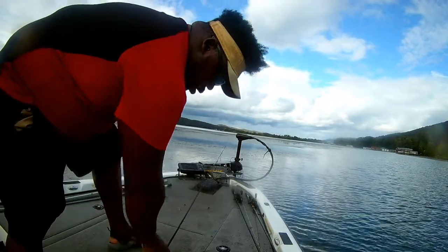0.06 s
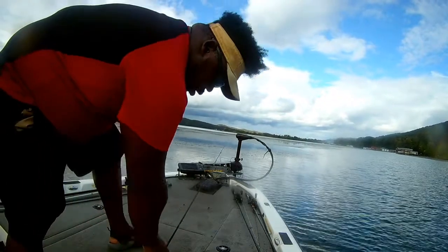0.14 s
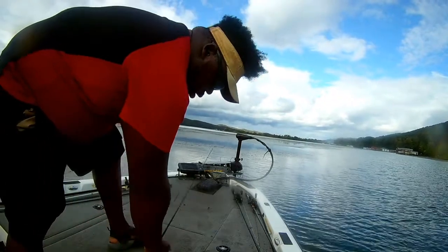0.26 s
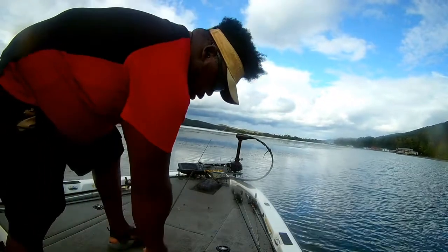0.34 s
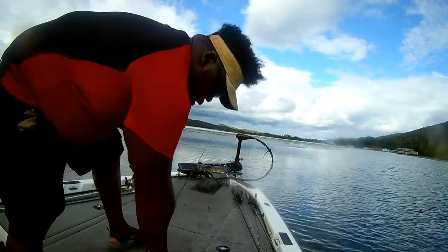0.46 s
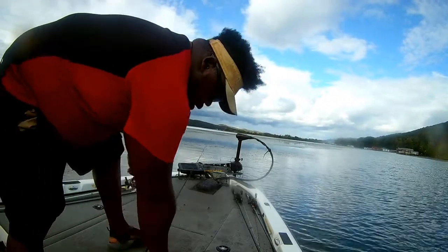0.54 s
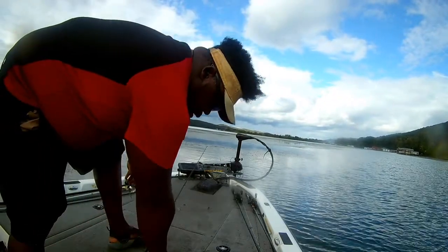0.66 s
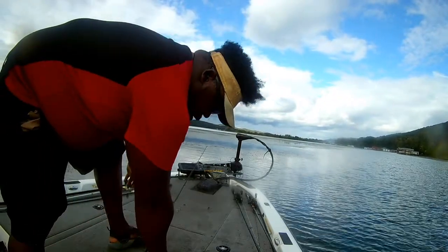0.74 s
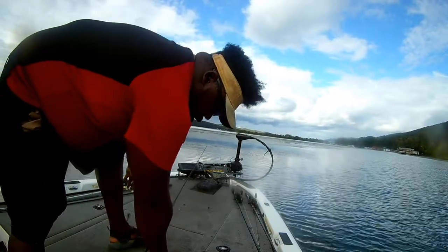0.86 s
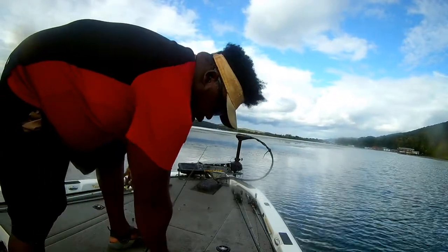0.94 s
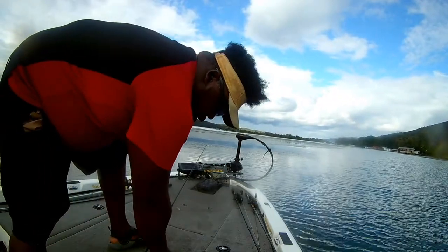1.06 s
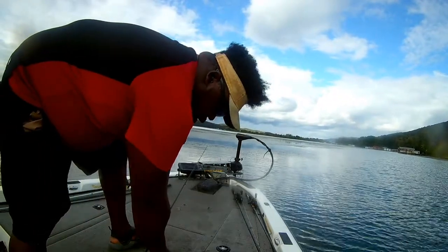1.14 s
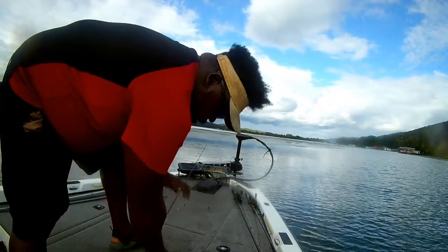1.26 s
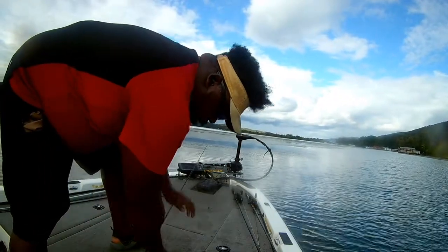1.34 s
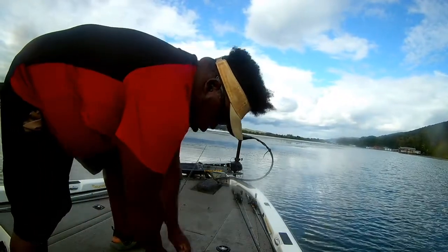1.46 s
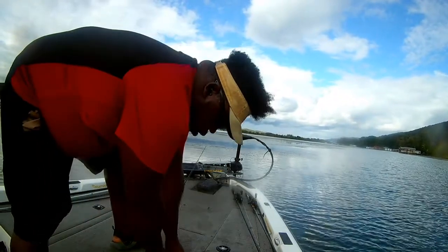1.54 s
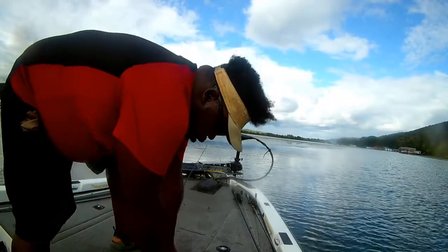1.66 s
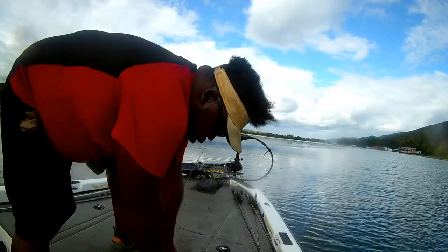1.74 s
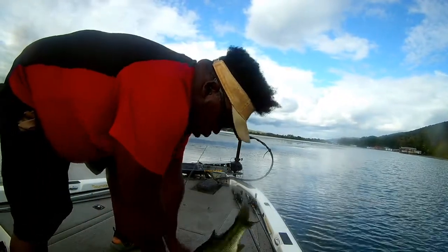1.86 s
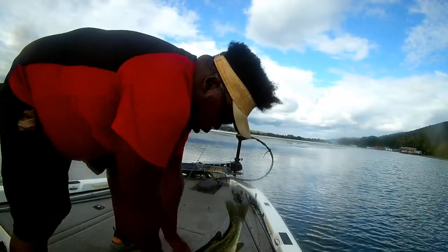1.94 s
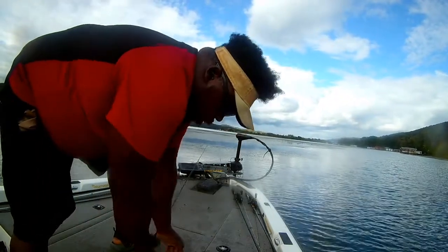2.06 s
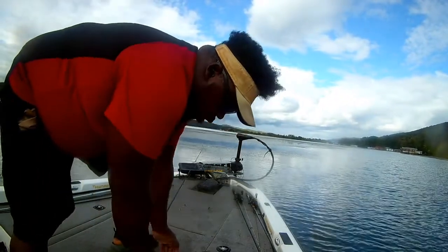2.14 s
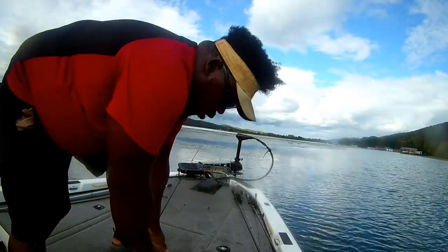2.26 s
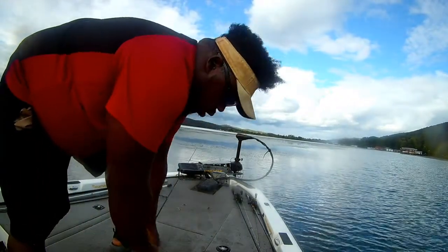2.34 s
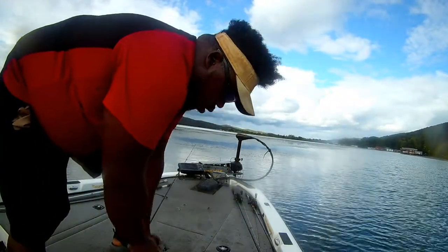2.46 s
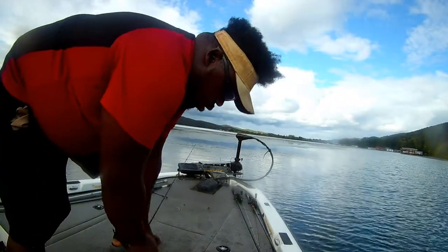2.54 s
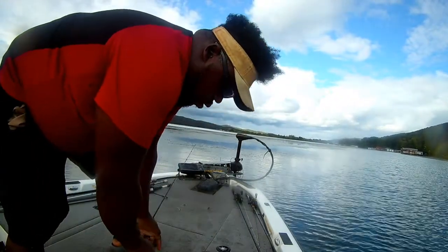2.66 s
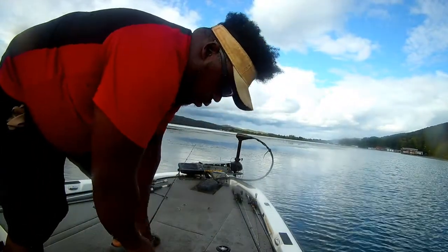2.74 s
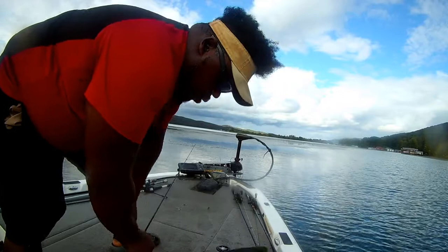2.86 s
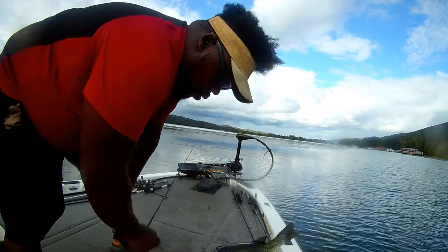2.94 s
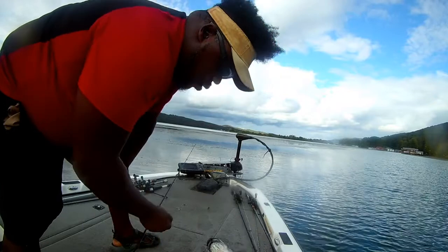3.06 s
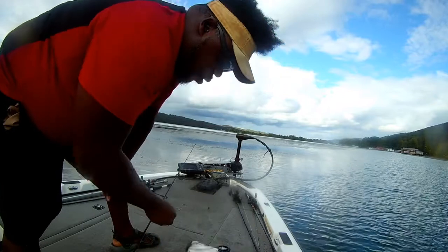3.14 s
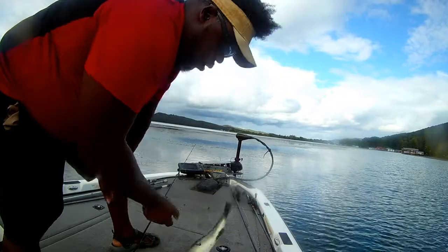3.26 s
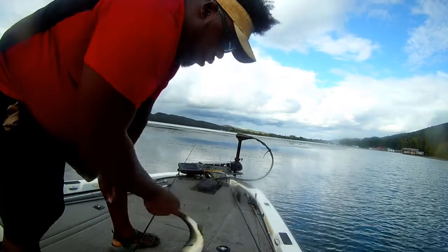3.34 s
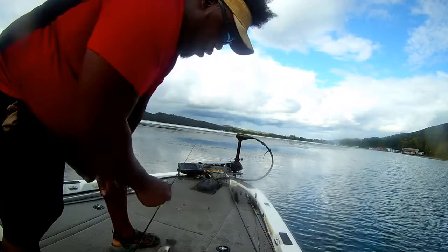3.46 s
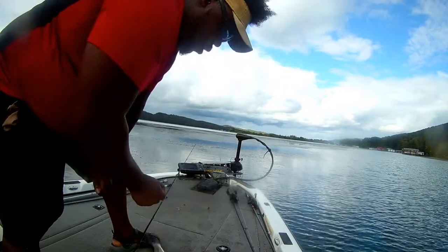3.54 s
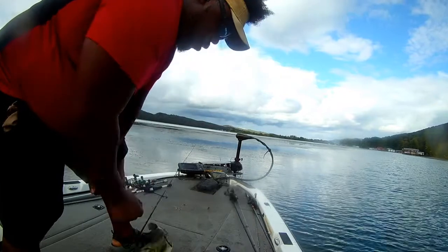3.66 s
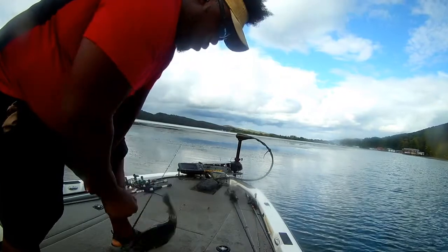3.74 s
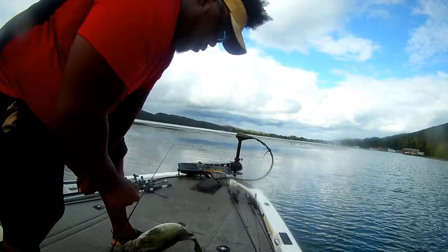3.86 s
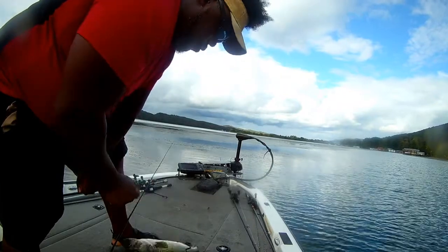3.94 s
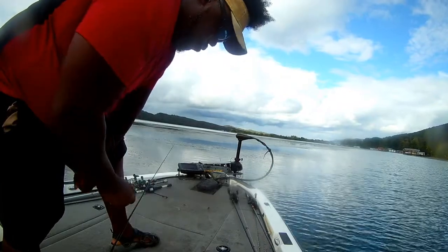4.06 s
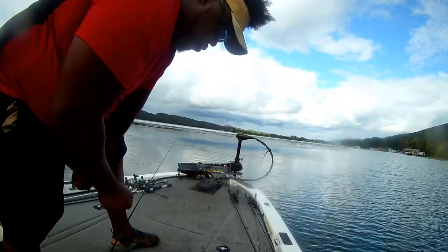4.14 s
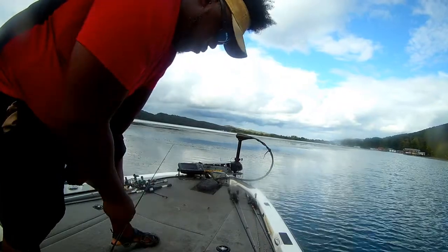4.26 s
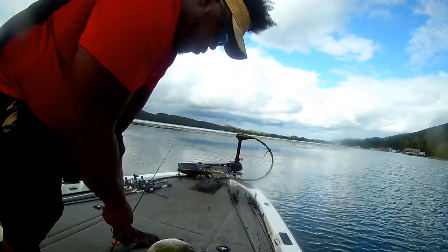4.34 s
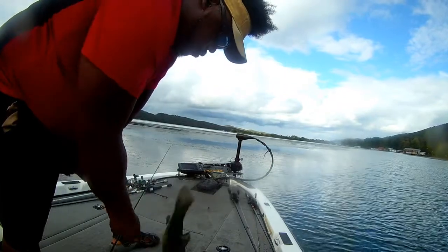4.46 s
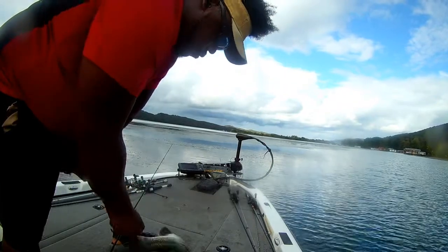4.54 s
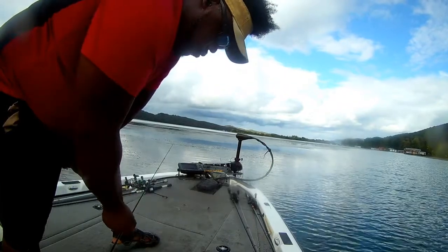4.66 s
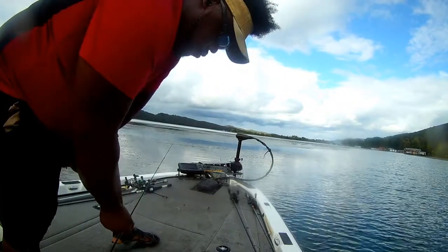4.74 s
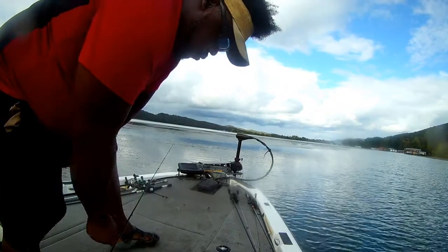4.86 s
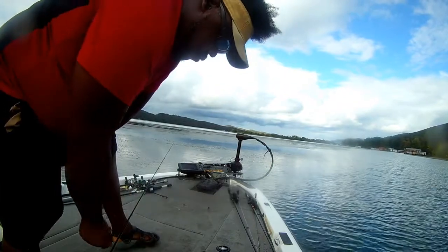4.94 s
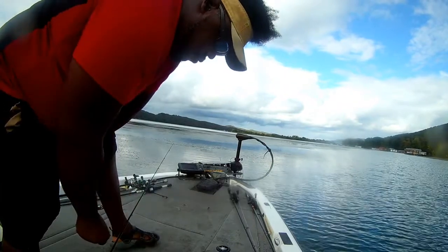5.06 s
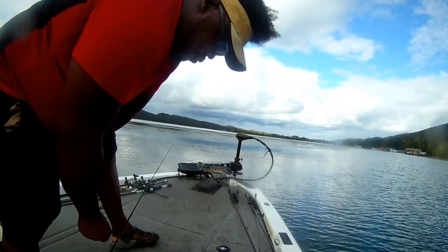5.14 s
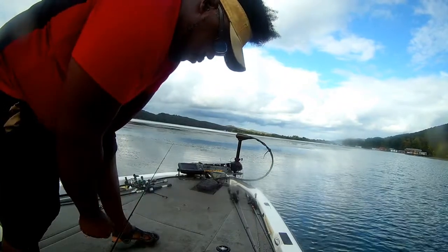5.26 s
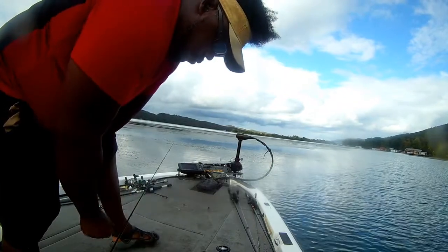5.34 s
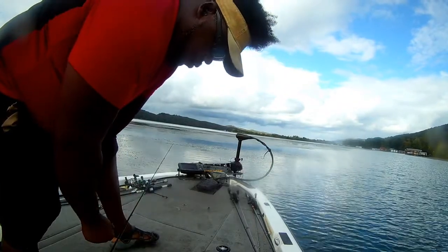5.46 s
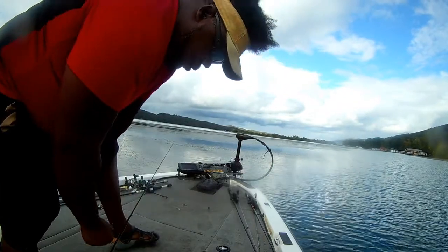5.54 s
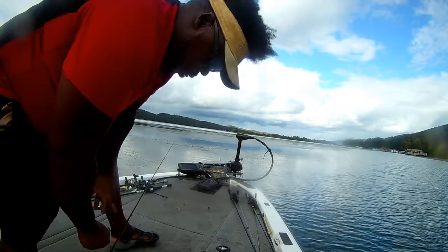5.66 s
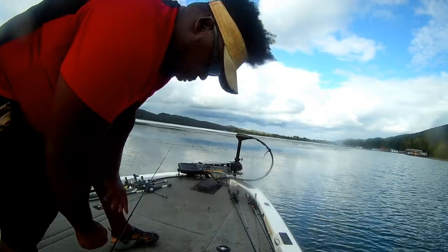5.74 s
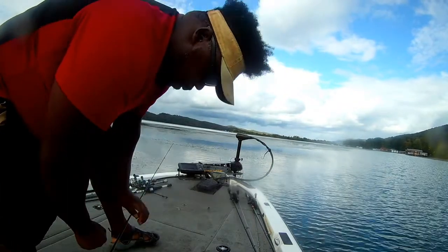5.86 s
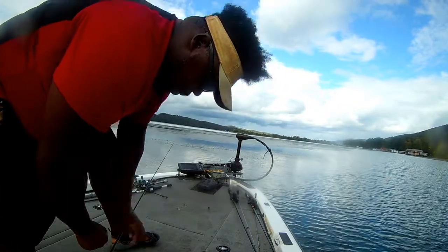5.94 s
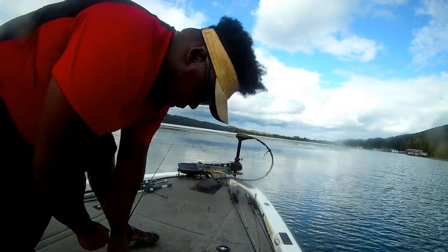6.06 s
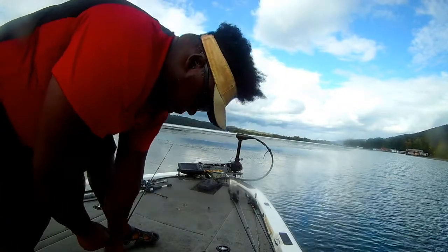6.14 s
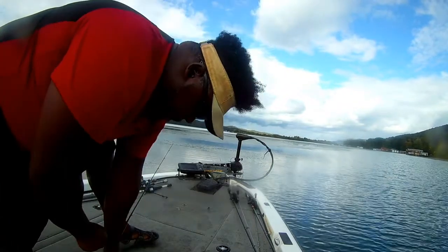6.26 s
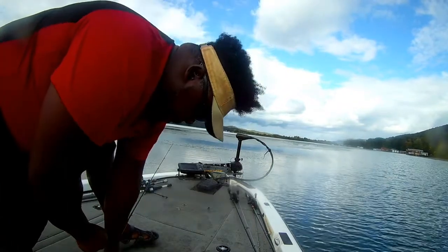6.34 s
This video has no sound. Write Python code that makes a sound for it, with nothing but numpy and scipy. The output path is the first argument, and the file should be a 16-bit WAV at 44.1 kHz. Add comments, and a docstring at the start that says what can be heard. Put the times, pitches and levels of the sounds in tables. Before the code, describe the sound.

Wind and water rumble low against the hull of a small boat, with a few soft bumps. Then a freshly caught fish thrashes on the carpeted deck close by: its body thuds on the hollow boards, its wet tail slaps and hatch lids knock, the hardest blows distorting. It skids briefly over the carpet, flops a few more times and lies still. Two dull bumps follow.

```python
"""Wind and water rumble on the hull of a small boat throughout, and a few soft bumps come first.
From about 2 s a freshly caught fish thrashes on the carpeted deck: its body thuds on the hollow boards,
its wet tail and fins slap, hatch lids knock, and the hardest blows distort. A faint whistle passes at
2.5 s, and just after 3 s the fish skids over the carpet. By 5 s it lies still; two more bumps follow."""
import sys
import numpy as np
from scipy import signal
from scipy.io import wavfile
from scipy.ndimage import uniform_filter1d

SR = 44100
rng = np.random.default_rng(int(sys.argv[2]) if len(sys.argv) > 2 else 0)


def materialize(psi):
    """Save the field psi as 16-bit PCM at rate SR to the path in sys.argv[1].

    A 1-D psi becomes a single channel; in a 2-D psi each row is a channel.
    """
    bounded = np.clip(np.atleast_2d(psi).T, -1, 1)
    quanta = np.round(bounded * 32767).astype(np.int16)
    wavfile.write(sys.argv[1], SR, quanta)


N = 282681


def gain_of(db):
    """Turns decibels into a factor to multiply by."""
    return 10 ** (np.asarray(db) / 20)


def unit_rms(x):
    """Scales a sound to an average (rms) level of one."""
    return x / np.sqrt(np.mean(x ** 2) + 1e-20)


def value_at(points, hz):
    """Looks up a frequency in a table, with every octave equally wide."""
    table_hz, value = np.transpose(points)
    return np.interp(np.log(hz + 1), np.log(table_hz + 1), value)


def add(mix, start, sound):
    """Lays a sound into the mix at a start in seconds."""
    part = mix[round(start * SR):][:len(sound)]
    part += sound[:len(part)]


def crest(x, size=128):
    """Height of the strongest few milliseconds of a sound."""
    return np.sqrt(2 * uniform_filter1d(x ** 2, size).max())


def coloured(x, db_at, size=4096):
    """Shapes the tone by the curve db_at(hz), ringing only after each click, never before."""
    hz = abs(np.fft.fftfreq(size, 1 / SR))
    log_gain = np.log(gain_of(db_at(hz)))
    taps = np.fft.ifft(np.exp(np.conj(signal.hilbert(log_gain)))).real
    return signal.fftconvolve(x, taps[:size // 2])[:len(x)]


def filtered(x, hz, kind, order=2):
    """Keeps what lies below hz ("low") or above it ("high")."""
    return signal.sosfilt(signal.butter(order, min(hz, SR / 2 - 1), kind, fs=SR, output="sos"), x)


def patchy_noise(colour, patchy_db):
    """Noise of a given tone colour whose level drifts in patches of time and pitch."""
    hz = np.fft.rfftfreq(2048, 1 / SR)
    real, imag, patches = rng.standard_normal((3, len(hz), N // 512 + 5))
    patches = uniform_filter1d(patches, size=7, axis=0)
    patches = unit_rms(uniform_filter1d(patches, size=6, axis=1))
    spectra = (real + 1j * imag) * gain_of(value_at(colour, hz)[:, None] + patchy_db * patches)
    return unit_rms(signal.istft(spectra, nperseg=2048, noverlap=1536)[1][:N])


def wind_and_water(rumble_boost_db=3, hiss_db=-61):
    """A lumpy rumble on the hull rises and falls with the wind, under an even hiss."""
    # Tone colours of the rumble and the hiss. Each row: frequency in Hz, relative level in dB.
    rumble_colour = [(20, -11.5), (70, -3), (117, -6), (166, -10.5), (213, -8), (290, -13.5), (329, -13.5),
                     (380, -20.5), (517, -27), (826, -36), (1500, -42), (2500, -65.5)]
    hiss_colour = [(300, -2), (1000, 9.5), (1500, 8.5), (2500, 0.5), (4500, -5.5), (10500, -12),
                   (15500, -7.5)]
    # Strength of the wind. Each row: time in seconds, relative level in dB.
    wind = [(0, -39.5), (1.8, -40.5), (3.5, -36), (4.602, -39), (6.41, -38)]
    wind_db = np.interp(np.arange(N) / SR, *np.transpose(wind))
    rumble = gain_of(wind_db + rumble_boost_db) * patchy_noise(rumble_colour, patchy_db=2.0)
    return rumble + gain_of(hiss_db) * patchy_noise(hiss_colour, patchy_db=0.8)


def whistle(flutter_hz=45):
    """A faint, thin, fluttering tone; gives its start and its sound."""
    # Path of the tone. Each row: time in seconds, pitch in Hz, level in dB.
    path = [(2.40, 2380, -90), (2.435, 2290, -63.5), (2.56, 2235, -62), (2.69, 2260, -68)]
    times, hz, db = np.transpose(path)
    t = np.arange(times[0], times[-1], 1 / SR)
    flutter = filtered(rng.standard_normal(len(t)) + 1j * rng.standard_normal(len(t)), flutter_hz, "low")
    cycles = np.cumsum(np.interp(t, times, hz)) / SR
    tone = (flutter * np.exp(2j * np.pi * cycles)).real
    return times[0], gain_of(np.interp(t, times, db)) * unit_rms(tone)


def thud(db, contact_hz, ring_db, damping=4.5, spread_db=5.5):
    """Something soft pushes the deck down and back, and the boards ring on at their own notes."""
    # Notes of the hollow deck. Each row: pitch in Hz, relative level in dB, seconds to fade by 60 dB.
    deck_notes = [(55.6, -8.5, 0.35), (72.5, 4.5, .26), (100, -0.5, 0.11), (116, 2.5, 0.16),
                  (156.2, -6.5, 0.27), (184, -5.5, 0.43), (199, 0, 0.14), (261.8, 3, 0.13),
                  (296.6, 5, 0.16), (338.6, 6.5, 0.11), (392.7, 3.5, 0.11), (453, -15, 0.076),
                  (537.4, -5, 0.18)]
    t = np.arange(SR // 2) / SR
    hz, note_db, fade_s = np.transpose(deck_notes)[:, :, None]
    side = (-1) ** np.arange(len(hz))[:, None]  # away from the blow, neighbouring notes swing opposite
    levels = gain_of(note_db + spread_db * rng.standard_normal(hz.shape) - 60 * t / fade_s)
    ring = (side * levels * np.sin(2 * np.pi * hz * t)).sum(0)
    ring = filtered(ring, 1.62 * contact_hz, "low")  # a long contact cannot stir the high notes
    ring = filtered(ring, 0.35 * contact_hz, "high")  # a brief one hardly moves the deepest
    cycles = contact_hz * t
    push = cycles ** 2 * np.exp(-damping * cycles) * np.sin(2 * np.pi * cycles)
    blow = push / crest(push) + gain_of(ring_db) * ring / crest(ring)
    return gain_of(db) * blow / crest(blow)


def soft_bumps():
    """Feet, fish and water bump gently against the boat."""
    # Each row is one bump: start in seconds, relative level in dB.
    bumps = [(0.447, -19), (0.485, -17), (1.03, -17.5), (1.325, -23.5), (1.68, -18.5), (2.514, -22.5),
             (3.03, -20), (4.152, -20.5), (4.868, -13), (5.956, -9), (6.12, -16)]
    mix = np.zeros(N)
    for start, db in bumps:
        add(mix, start, thud(db, contact_hz=84, ring_db=-10.5))
    return mix


def lid_knocks():
    """A hatch lid struck by the soft body gives one short, hollow note."""
    # Each row is one knock: start in seconds, pitch in Hz, level in dB, seconds to fade by 60 dB.
    knocks = [(2.157, 1066, 0.5, 0.027), (2.363, 987, -28.5, 0.045), (2.7245, 547, -19, 0.1),
              (3.2013, 456, -14, 0.037), (3.317, 276, -8.5, 0.046), (3.479, 643, -5.5, 0.022),
              (3.798, 209, -17.5, 0.061), (4.754, 484, -10, 0.057)]
    t = np.arange(SR // 4) / SR
    mix = np.zeros(N)
    for start, hz, db, fade_s in knocks:
        swell = 1 - np.exp(-4 * hz * t)  # builds over about a quarter of a cycle
        add(mix, start, gain_of(db - 60 * t / fade_s) * swell * np.sin(2 * np.pi * hz * t))
    return mix


def skid(snags_per_s=600, uneven_db=1.0):
    """Scales snag on the carpet in a run of tiny, uneven clicks; gives the start and the sound."""
    # Loudness of the skid. Each row: time in seconds, level in dB.
    loudness = [(3.15, -52), (3.18, -55), (3.215, -52), (3.245, -67), (3.258, -48), (3.291, -47),
                (3.305, -56), (3.321, -51), (3.36, -68)]
    # Tone colour of the rubbing. Each row: frequency in Hz, relative level in dB.
    colour = [(500, -9), (1300, 2), (1700, 7.5), (2300, -4), (2700, -7), (5000, -13), (7000, -21),
              (9000, -35)]
    times, db = np.transpose(loudness)
    t = np.arange(times[0], times[-1], 1 / SR)
    signs = rng.choice([-1, 1], len(t))
    sizes = gain_of(uneven_db * np.minimum(rng.exponential(1, len(t)), 4))
    snags = signs * sizes * (rng.random(len(t)) < snags_per_s / SR)
    rubbing = coloured(snags, lambda hz: value_at(colour, hz))
    return times[0], gain_of(np.interp(t, times, db)) * unit_rms(rubbing)


def panel_ring(slaps, panel_db=-20, wash_db=-11):
    """Stiff panels ring on after each slap, in a wash of crowded notes whose treble dies first."""
    # Notes of the panels. Each row: pitch in Hz, relative level in dB, seconds to fade by 60 dB.
    panel_notes = [(820, -1.5, 0.085), (995, -8, 0.15), (1190, -8, 0.046), (1783, 3, 0.036),
                   (3010, -2, 0.044), (4130, -6, 0.066)]
    # How long the wash lasts. Each row: frequency in Hz, seconds to fade by 60 dB.
    wash_fades = [(300, 0.33), (1000, 0.12), (4500, 0.032), (9000, 0.017)]
    bands, times, spectra = signal.stft(rng.standard_normal(SR // 3), SR, nperseg=256)
    fade = gain_of(-60 * times / value_at(wash_fades, bands)[:, None])
    wash = signal.istft(spectra * fade, SR, nperseg=256)[1]
    t = np.arange(len(wash)) / SR
    ring = sum(gain_of(db - 60 * t / fade_s) * np.cos(2 * np.pi * hz * t)
               for hz, db, fade_s in panel_notes)
    tail = gain_of(panel_db) * ring / np.linalg.norm(ring)
    tail += gain_of(wash_db) * wash / np.linalg.norm(wash)
    return signal.fftconvolve(slaps, tail)[:N]


def slap(db, treble_db, splatter_s, tilt_db, contacts_per_s=5000, split_hz=2700):
    """A first smack, then a splatter of tiny contacts as wet skin and fin rays lie down."""
    # Tone colour of a slap on the deck. Each row: frequency in Hz, relative level in dB.
    colour = [(150, -10), (450, 6), (720, -2.5), (990, 1), (1170, -3), (1350, -10.5), (1830, -7.5),
              (2220, -9), (2520, -27), (3000, -20.5), (3800, -22), (4300, -20.5), (5000, -33),
              (7000, -40.5), (8200, -49.5), (14000, -56.5)]
    t = np.arange(SR // 8) / SR
    splatter = rng.standard_normal(len(t)) * (rng.random(len(t)) < contacts_per_s / SR)
    splatter *= np.exp(-t / splatter_s)
    splatter /= np.linalg.norm(splatter) + 1e-9
    force = splatter_s / 0.0032 * splatter  # a slap slower than 3.2 ms is mostly splatter
    force[0] += 1  # the smack
    sound = coloured(force, lambda hz: value_at(colour, hz)
                     + tilt_db * np.log2(np.clip(hz, 300, split_hz) / split_hz))
    body = filtered(sound, split_hz, "low", order=4)
    treble = filtered(sound, split_hz, "high", order=4)
    return gain_of(db - 2) * body / crest(body) + gain_of(treble_db - 3) * treble / crest(treble)


def tail_slaps(tilt_db=-0.5, usual_splatter_s=0.0043, patter_gap_s=0.014, patter_loss_db=5.5):
    """The wet tail and fins slap the deck; each time the fin patters three more times, ever weaker."""
    # Each row is one slap: start in seconds, relative levels of its lower part and of its treble in dB,
    # fading time of the splatter in seconds.
    slaps = [(1.7199, -26.5, -44.5, 0.0027), (2.127, -17, -35, 0.006), (2.138, -11, -29.5, 0.01),
             (2.158, -1.5, -17.5, 0.0022), (2.1737, -4, -32, 0.0047), (2.215, -25.5, -41, 0.0037),
             (2.229, -17, -42, 0.003), (2.261, -33, -68, 0.0047), (2.680, -16.5, -35, 0.008),
             (2.691, -11.5, -27, 0.0037), (2.722, -14.5, -38, 0.0039), (3.054, -38, -47, 0.0068),
             (3.1417, -18, -43.5, 0.011), (3.186, -24, -60, 0.0098), (3.220, -27.5, -36.5, 0.0062),
             (3.346, -31, -68, .0065), (3.479, -16.5, -30, 0.0025), (3.514, -28, -58, .005),
             (3.535, -38, -47.5, .005), (3.595, -38, -63, 0.0039), (3.6187, -30, -59, 0.0055),
             (3.713, -36.5, -56, 0.0064), (4.006, -21.5, -36, 0.0056), (4.029, -15.5, -37.5, 0.0068),
             (4.239, -35, -58, 0.004), (4.272, -27.5, -56, 0.007), (4.747, -17, -46, 0.007),
             (4.754, -13, -37, .009), (4.795, -20, -36, .0047), (4.851, -36.5, -63, 0.0047),
             (4.886, -31, -68, 0.005)]
    mix = np.zeros(N)
    for start, db, treble_db, splatter_s in slaps:
        # A slow slap is duller. Tilt and dulling are in dB per octave.
        dulling_db = 2.5 * np.log2(splatter_s / usual_splatter_s)
        add(mix, start, slap(db, treble_db, splatter_s, tilt_db - dulling_db))
        gaps = patter_gap_s * np.exp(0.27 * rng.standard_normal(3))
        for k, delay in enumerate(np.cumsum(gaps)):
            loss_db = k * patter_loss_db
            patter = slap(db - 12.5 - loss_db, treble_db - 16.5 - loss_db, 0.004, tilt_db)
            add(mix, start + delay, patter)
    return mix


def body_flops(bounce_gap_s=0.0185, wobble_hz=75, slowing=0.092):
    """The fish lands and bounces three times, each contact softer and nearer its own slow wobble."""
    # Each row is one landing: start in seconds, relative level in dB, speed of the contact as a pitch
    # in Hz, the deck's ring compared with the push in dB, loss per bounce in dB.
    landings = [(2.1261, 6, 173, -9.5, 8.5), (2.664, -2, 82, -4.5, 3), (3.122, -10.5, 107, -5, 3),
                (3.339, -10, 120, -11, 16), (3.478, 2.5, 198, -3.5, 31), (4.001, -5.5, 120, -9, 7.5),
                (4.258, -10.5, 122, -6, 5.5), (4.751, -1, 117, -1.5, 9.5)]
    mix = np.zeros(N)
    for start, db, contact_hz, ring_db, loss_db in landings:
        add(mix, start, thud(db, contact_hz, ring_db))
        for k in (1, 2, 3):
            hz = wobble_hz + (contact_hz - wobble_hz) * slowing ** k
            add(mix, start + k * bounce_gap_s, thud(db - k * loss_db, hz, ring_db=-3.5))
    return mix


def scene():
    """The fish on the deck, with wind and water around it, in one channel."""
    thuds = gain_of(-2) * (body_flops() + soft_bumps())
    slaps = tail_slaps()
    mix = thuds + lid_knocks() + slaps + panel_ring(slaps) + wind_and_water()
    add(mix, *skid())
    add(mix, *whistle())
    return mix[None]


def record(dry, top_hz=15900):
    """Flattens the peaks of the loudest blows, then cuts the very highest treble."""
    clipped = dry / (1 + dry ** 24) ** (1 / 24)
    low_pass = signal.firwin(511, top_hz, window=("kaiser", 9), fs=SR)
    return signal.oaconvolve(clipped, low_pass[None], "same")


dry = scene()
out = record(dry)
materialize(out)
```